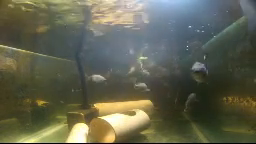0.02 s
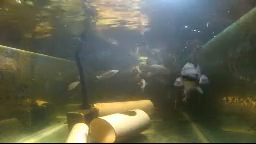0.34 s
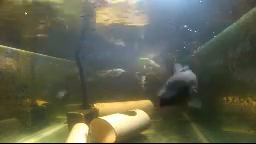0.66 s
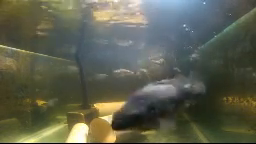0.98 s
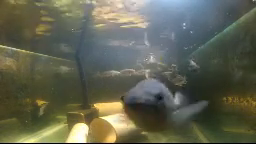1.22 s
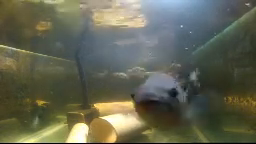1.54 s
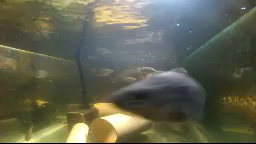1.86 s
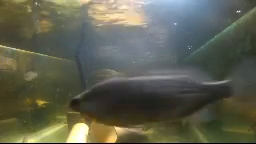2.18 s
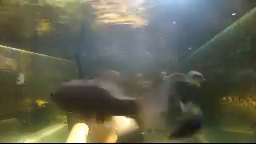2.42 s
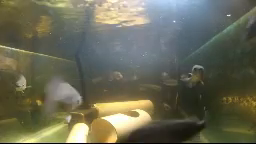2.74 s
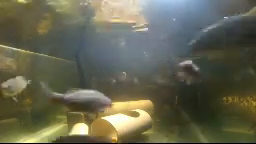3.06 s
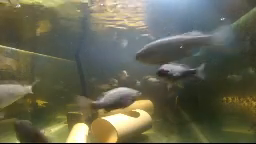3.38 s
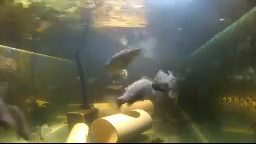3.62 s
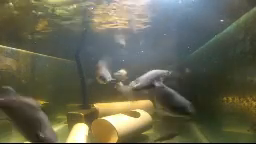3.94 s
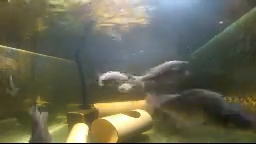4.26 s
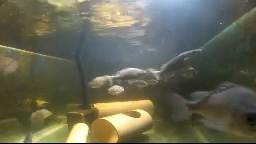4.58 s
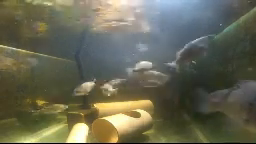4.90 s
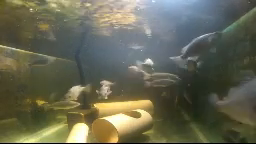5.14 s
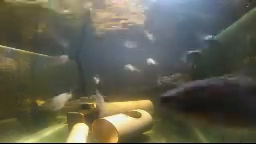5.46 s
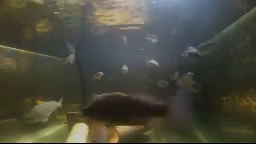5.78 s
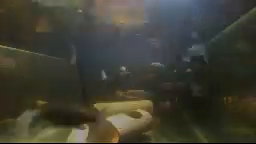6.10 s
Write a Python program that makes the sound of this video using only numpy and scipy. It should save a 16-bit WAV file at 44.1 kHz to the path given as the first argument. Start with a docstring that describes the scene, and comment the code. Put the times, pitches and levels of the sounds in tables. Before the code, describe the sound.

Underwater in an aquarium, a close pump drones low and evenly, its overtones slowly shifting over a muffled wash of moving water. The impeller rasps lightly throughout and knocks a little harder a few times. Tiny bubble ticks and clicks of grit are scattered through it, with a single soft tail thump near the middle. A very faint, thin whine sits on top, and the level dips slightly toward the end.

```python
"""A mains-driven water pump hums in a fish tank, with the microphone under the water beside it.
Its impeller scrapes once a turn, ringing the housing and the tank, and now and then knocks harder.
Water churns, grit clicks, small bubbles tick and a fish gives one soft thump with its tail.
The recorder mirrors the sound faintly around a high carrier, a thin whine; the level sinks at the end."""
import sys
import numpy as np
from scipy import signal
from scipy.fft import rfft, irfft
from scipy.io import wavfile
from scipy.ndimage import uniform_filter1d

SR = 44100
rng = np.random.default_rng(int(sys.argv[2]) if len(sys.argv) > 2 else 0)


def file_out(sig):
    """Save sig as 16-bit WAV at sys.argv[1]."""
    # one column per channel
    cols = np.atleast_2d(sig).T
    # limit, then scale
    lim = np.clip(cols, -1, 1)
    pcm = np.round(lim * 32767).astype(np.int16)
    wavfile.write(sys.argv[1], SR, pcm)


N = 274302
MAINS_HZ = 50.056

# a narrow emphasis wandering over the hum's overtones: time_s, centre_hz, lift_db
EMPHASIS_PATH = [(0.05, 519.5, 9.5), (.3, 455, 5), (.6, 444.5, 10.5), (2.0, 444.7, 10), (2.2, 535, 0.5),
                 (2.5, 562.5, 10.5), (3.9, 564.6, 1.5), (4.35, 500.6, -0.5), (4.8, 476, 7.5),
                 (5.3, 499.5, 5), (6.2, 476, 4)]


def undb(db):
    """Decibels to gain."""
    return 10 ** (np.asarray(db) / 20)


def unit(x):
    """Scale to rms 1."""
    return x / np.sqrt(np.mean(x ** 2))


def curves(table):
    """Each column after the first as a line through time."""
    time_s, *columns = np.transpose(table)
    return [np.interp(np.arange(N) / SR, time_s, column) for column in columns]


def walk(rate_hz):
    """A smooth random wander of rms 1."""
    step = int(SR / rate_hz)
    held = np.repeat(rng.standard_normal(N // step + 1), step)
    return unit(uniform_filter1d(uniform_filter1d(held, step), step)[:N])


def coloured_noise(points):
    """Noise of rms 1, shaped by (Hz, dB) points."""
    hz, db = np.transpose(points)
    bins_hz = np.arange(N // 2 + 1) * SR / N
    gain = undb(np.interp(np.log(bins_hz + 1), np.log(hz), db))
    return unit(irfft(rfft(rng.standard_normal(N)) * gain, N))


def resonate(x, modes):
    """Ring (Hz, width, dB) modes, each applied twice so that the valleys stay dark."""
    out = 0
    for hz, width, db in modes:
        b, a = signal.iirpeak(hz, hz / (width * np.pi / 2), fs=SR)
        out = out + undb(db) * signal.lfilter(b, a, signal.lfilter(b, a, x))
    return out


def place(sound, start_s):
    """Set a short sound into silence."""
    return np.pad(sound, (int(start_s * SR), N))[:N]


def ring(start_s, peak_db, hz, t60_s, rise_s):
    """A sine that swells smoothly for a moment and dies away."""
    age = np.arange(SR // 4) / SR
    shape = (1 - np.exp(-(age / rise_s) ** 2)) * np.exp(-np.log(1000) * age / t60_s)
    return place(undb(peak_db) * shape / shape.max() * np.sin(2 * np.pi * hz * age), start_s)


def burst(samples, t60_s):
    """Noise that starts at once and dies away."""
    age = np.arange(samples) / SR
    return rng.standard_normal(samples) * np.exp(-np.log(1000) * age / t60_s)


def hum(turns, fade_db, waver_db=0.88, waver_cycles=0.024, lag_cycles=0.02986, emphasis_width_hz=31.4):
    """The pump's mains-locked harmonics: the lowest are steady, the higher ones waver and lag."""
    # the pump's harmonics: mains_multiple, base_level_db
    harmonics = [(1, -29.2), (2, -22.5), (3, -42), (4, -40), (5, -42.5), (6, -46.5), (7, -30), (8, -40.5),
                 (9, -49.5), (10, -39), (11, -46.5), (12, -51), (13, -65), (14, -52)]
    # the seventh harmonic slowly swells and sinks: time_s, gain_db
    seventh_swell = [(.2, -1.4), (1.3, 1.24), (2.7, 0.58), (3.45, -1.8), (4.05, 1.5), (5.6, -1.8)]
    centre_hz, lift_db = curves(EMPHASIS_PATH)
    swell_db, = curves(seventh_swell)
    out = 0
    for k, base_db in harmonics:
        looseness = (k / 10) ** 2
        emphasis_db = lift_db * np.exp(-((k * MAINS_HZ - centre_hz) / emphasis_width_hz) ** 2 / 2)
        level_db = base_db + fade_db + emphasis_db + swell_db * (k == 7)
        level_db += looseness * waver_db * walk(12)
        phase = k * turns - lag_cycles * k ** 2 + looseness * waver_cycles * walk(8.9)
        out = out - np.sqrt(2) * undb(level_db) * np.sin(2 * np.pi * phase)
    return out


def burble(fade_db, base_db=-51, follow=.3, flutter_hz=130):
    """A rough flutter surrounds the emphasised overtones and grows with them."""
    centre_hz, lift_db = curves(EMPHASIS_PATH)
    angle = 2 * np.pi * np.cumsum(centre_hz) / SR
    flutter = walk(flutter_hz) * np.cos(angle) + walk(flutter_hz) * np.sin(angle)
    return unit(flutter) * undb(base_db + fade_db + follow * lift_db)


def scrape(turns, stroke_db=3, scatter_db=1.0, grain_db=1.5, decay_turns=0.27, rub=.6):
    """Once a turn the impeller scrapes its shaft, each time with another force."""
    force = undb(scatter_db * rng.standard_normal(int(turns[-1]) + 1))[turns.astype(int)]
    pressure = rub + undb(stroke_db) * force * np.exp(-(turns % 1) / decay_turns)
    return pressure * rng.standard_normal(N) * undb(grain_db * walk(600))


def chatter(turns, fade_db, housing_db=-1, drone_db=-42, surge_db=7, surge_s=0.55):
    """Scraping rings the small housing brightly and the tank in a drone that starts strong and settles."""
    # how hard the impeller chatters: time_s, force_db
    force_path = [(.1, -42.5), (.7, -45), (1.3, -45), (2.0, -45), (2.2, -46), (3.0, -47.5), (3.8, -45.5),
                  (4.5, -45), (5.2, -44), (5.6, -47.5), (6.2, -50)]
    # resonances of the pump housing: pitch_hz, width_hz, gain_db
    housing_modes = [(875, 56, -3.5), (1138.3, 67, 2.5), (1378, 200, -14), (1490, 140, -11),
                     (1789, 100, -11), (2292, 150, -17), (2753, 110, -19), (2878, 130, -29),
                     (3314, 47, -22), (3530, 130, -22)]
    # low resonances of the tank: pitch_hz, width_hz, gain_db
    tank_modes = [(522.5, 41, 1), (561.3, 26, 1), (686, 30, -10)]
    force_db, = curves(force_path)
    water_damping = signal.butter(8, 4300, fs=SR, output="sos")
    housing = unit(signal.sosfilt(water_damping, resonate(scrape(turns), housing_modes)))
    tank = unit(resonate(scrape(turns), tank_modes))
    settling_db = surge_db * np.exp(-(np.arange(N) / SR / surge_s) ** 2)
    return housing * undb(force_db + housing_db) + tank * undb(drone_db + fade_db + settling_db)


def flow(fade_db, base_db=-38):
    """Churning water rumbles under the hum."""
    # the rush of water through the pump: frequency_hz, density_db
    spectrum = [(15, -29), (40, -11), (80, -6), (180, -6), (250, -10), (310, -4.5), (365, 1), (450, -7),
                (600, -8.5), (760, -16.5), (1400, -20), (3000, -48.5), (5000, -49.5), (6200, -65.5)]
    return coloured_noise(spectrum) * undb(base_db + fade_db)


def grit(t60_s=0.079):
    """Specks of grit click against the pump."""
    # tiny dry clicks: start_s, peak_db
    specks = [(.2885, -58), (1.134, -59), (2.215, -66), (4.980, -60), (5.8155, -62)]
    band = signal.butter(2, [3000, 5500], "bandpass", fs=SR, output="sos")
    out = np.zeros(N)
    for start_s, peak_db in specks:
        click = signal.sosfilt(band, burst(SR // 20, t60_s))
        out += place(undb(peak_db) * click / np.abs(click).max(), start_s)
    return out


def bubbles(echo_db=-10, echo_t60_s=0.071):
    """Bubbles pinch off and ring briefly; the glass walls throw each tick back."""
    # bubbles, some in pairs: start_s, peak_db, pitch_hz
    ticks = [(.9085, -47, 3460), (.9090, -51, 4080), (1.134, -51, 3000), (1.939, -42, 3080),
             (1.9405, -40, 3440), (2.462, -49.5, 2780), (2.7457, -43, 3160), (3.095, -51, 2770),
             (3.2226, -48, 3580), (3.3523, -44.5, 3400), (4.4452, -40.5, 3480), (4.9802, -38, 3530),
             (4.9806, -60, 5400), (5.0432, -33, 2770), (5.0442, -44, 3200), (5.252, -48, 3480),
             (5.379, -51, 3380)]
    direct = sum(ring(*tick, t60_s=.022, rise_s=.001) for tick in ticks)
    walls = burst(SR // 10, echo_t60_s)
    echo = signal.fftconvolve(direct, walls / np.linalg.norm(walls))[:N]
    return direct + undb(echo_db) * echo


def knocks():
    """Harder knocks of the impeller ring the housing near its strongest resonance."""
    # the impeller's knocks: start_s, peak_db
    hits = [(1.878, -33), (2.720, -35.5), (3.913, -34.5), (3.954, -33), (4.609, -34.5)]
    return sum(ring(*hit, hz=1120, t60_s=0.034, rise_s=.002) for hit in hits)


def fish_thump(start_s=2.727):
    """A fish flicks its tail and the tank answers softly."""
    # the tank's modes under the flick: peak_db, pitch_hz, t60_s
    modes = [(-21.5, 362, 0.11), (-26, 185, 0.043), (-27, 262, 0.033), (-27, 440, 0.043)]
    return sum(ring(start_s, *mode, rise_s=0.0063) for mode in modes)


def scene():
    """Pump, water and small events at one underwater microphone."""
    # hum, burble, tank drone and flow sink together: time_s, gain_db
    fade_path = [(0, -1), (5.4, -1.5), (5.8, -3.5), (6.22, -5)]
    fade_db, = curves(fade_path)
    turns = MAINS_HZ * np.arange(N) / SR
    scrape_turns = turns + .2  # the scrape comes a little ahead of the magnet's pull
    pump = hum(turns, fade_db) + burble(fade_db) + chatter(scrape_turns, fade_db)
    return (pump + flow(fade_db) + grit() + bubbles() + knocks() + fish_thump())[None]


def record(dry, whine_gain_db=2.5, carrier_hz=12000, hiss_db=-72, top_hz=14100):
    """Uneven sample timing mirrors the sound's slope around a carrier; hiss is added, the top is cut."""
    # the recorder's faint hiss: frequency_hz, density_db
    hiss_spectrum = [(6000, -30.5), (8000, -8), (10500, -1.0), (12000, -3.5), (14000, -16.0)]
    t = np.arange(N) / SR
    from_edge_s = np.minimum(t, t[::-1])
    dry = dry * np.sin(np.pi / 2 * np.minimum(from_edge_s / .001, 1)) ** 2  # 1 ms fade at each end
    slope = np.diff(dry, prepend=dry[:, :1])
    whine = undb(whine_gain_db) * slope * np.cos(2 * np.pi * carrier_hz * t)
    hiss = undb(hiss_db) * coloured_noise(hiss_spectrum)
    lowpass = signal.ellip(8, .2, 70, top_hz, fs=SR, output="sos")
    return signal.sosfilt(lowpass, dry + whine + hiss)


dry = scene()
out = record(dry)
file_out(out)
```